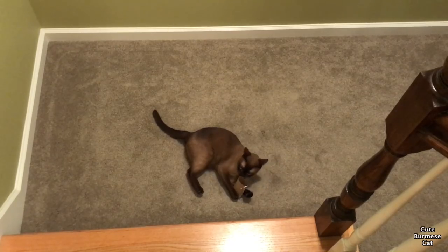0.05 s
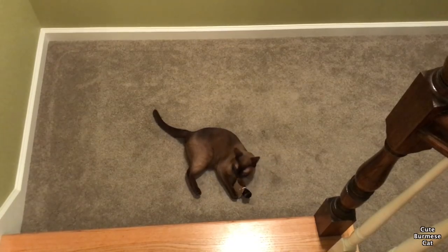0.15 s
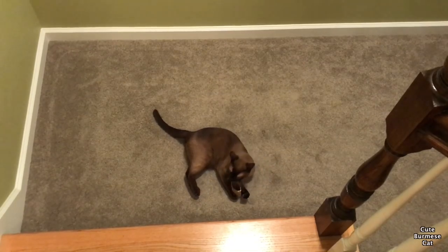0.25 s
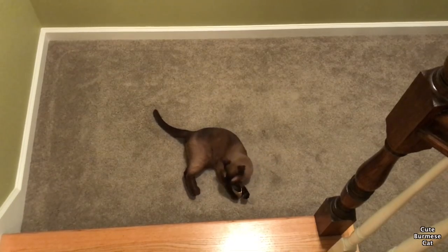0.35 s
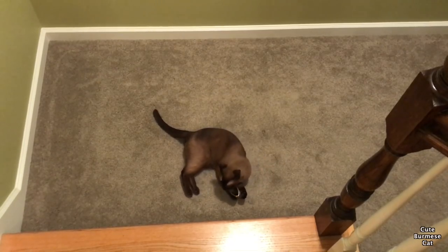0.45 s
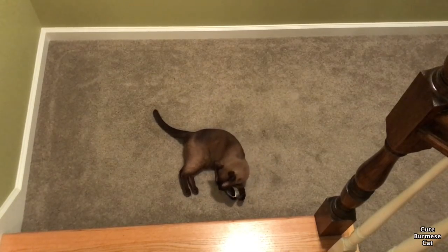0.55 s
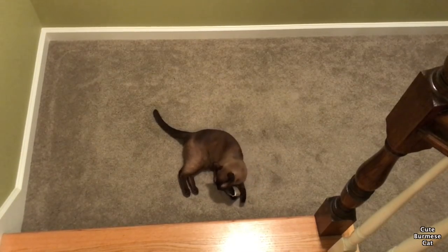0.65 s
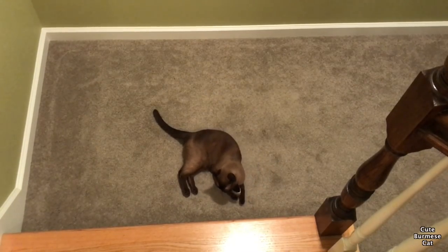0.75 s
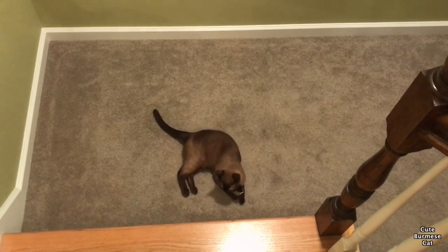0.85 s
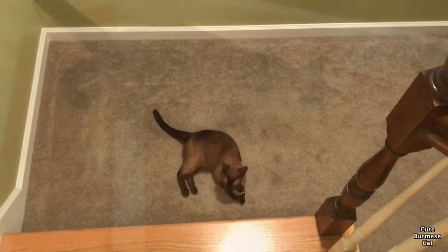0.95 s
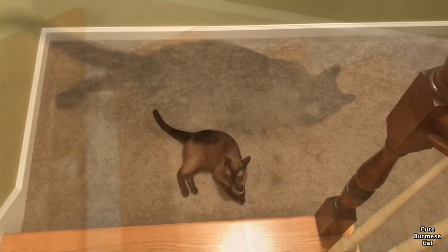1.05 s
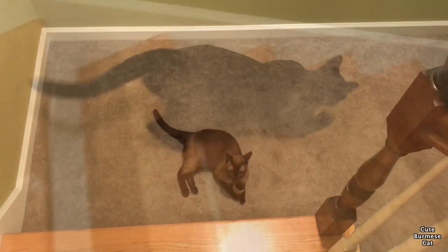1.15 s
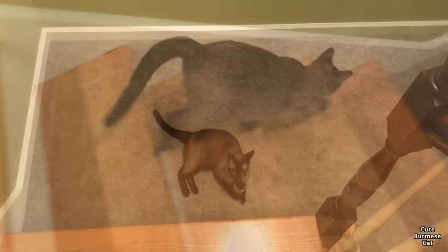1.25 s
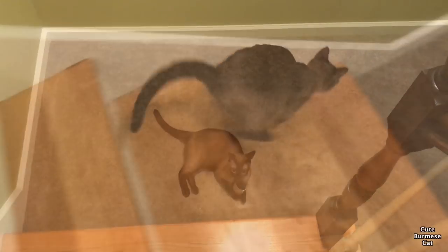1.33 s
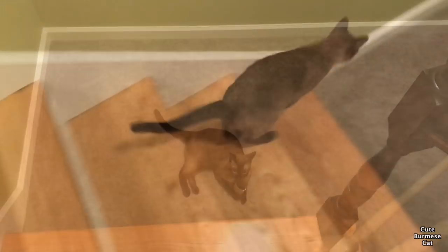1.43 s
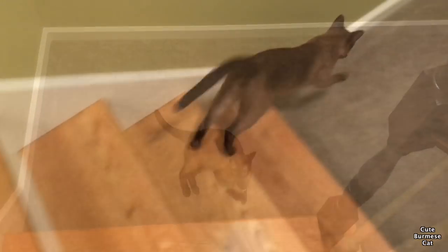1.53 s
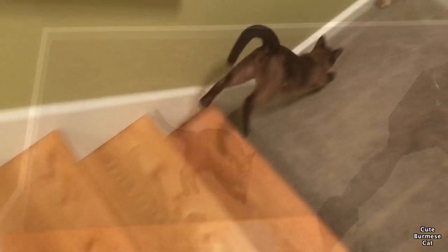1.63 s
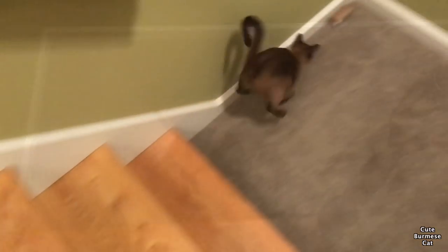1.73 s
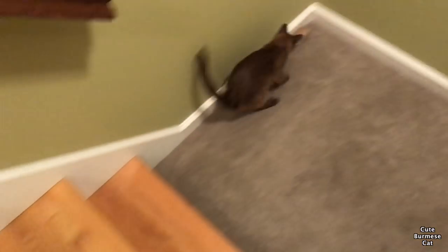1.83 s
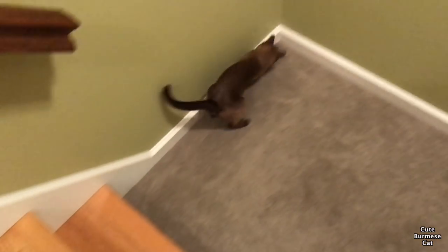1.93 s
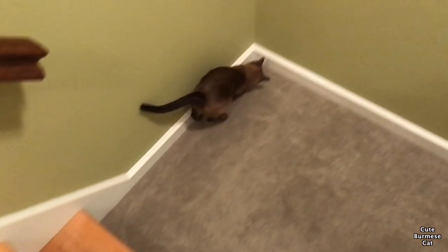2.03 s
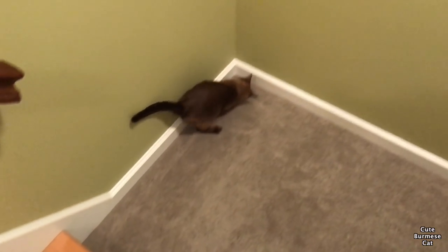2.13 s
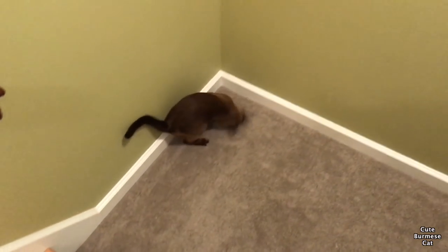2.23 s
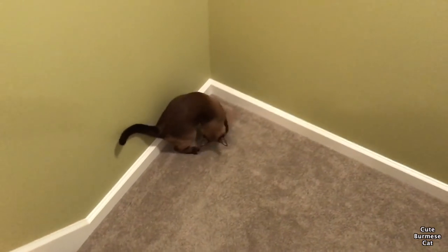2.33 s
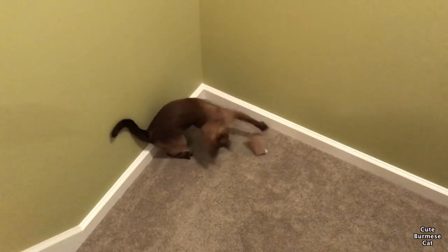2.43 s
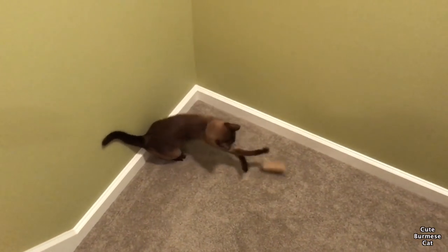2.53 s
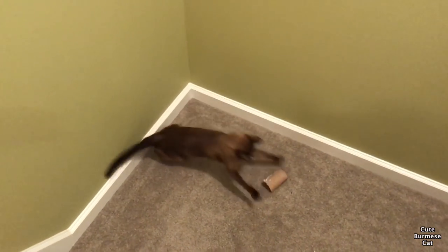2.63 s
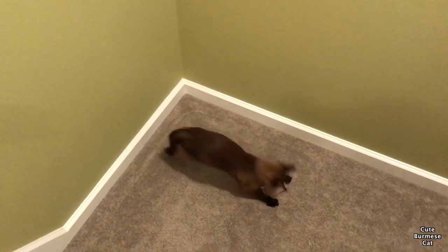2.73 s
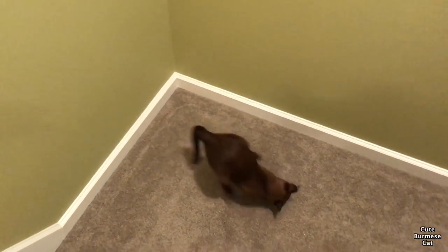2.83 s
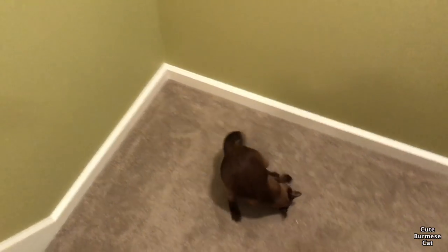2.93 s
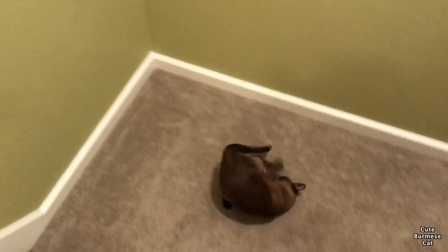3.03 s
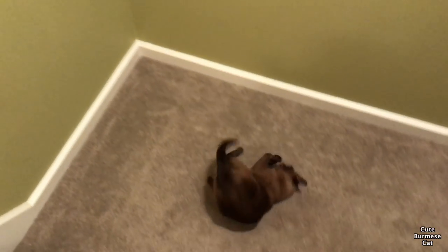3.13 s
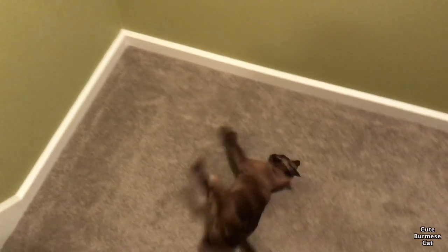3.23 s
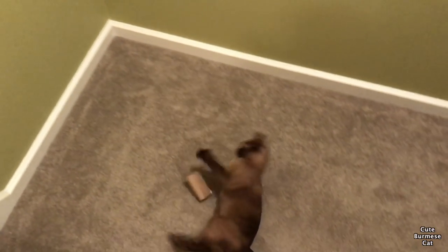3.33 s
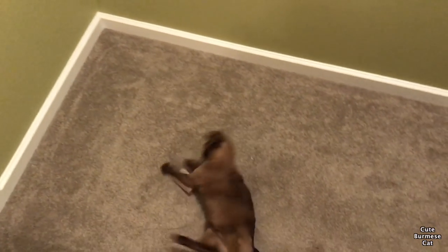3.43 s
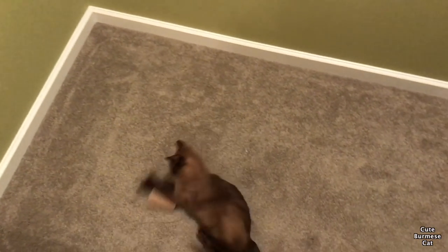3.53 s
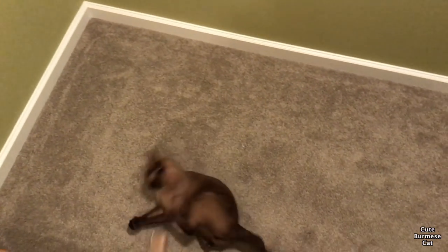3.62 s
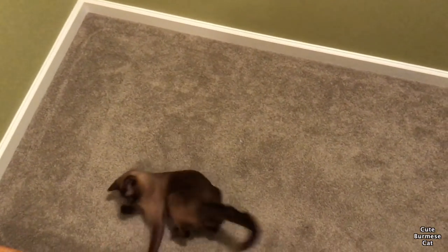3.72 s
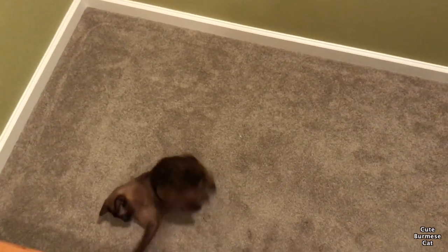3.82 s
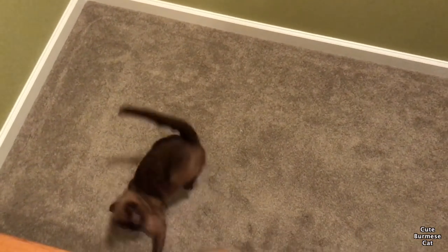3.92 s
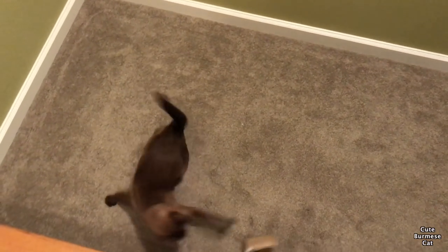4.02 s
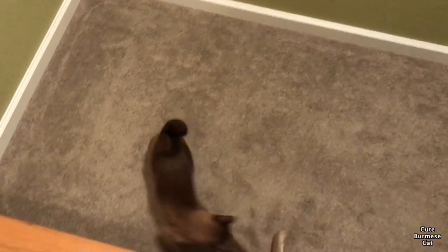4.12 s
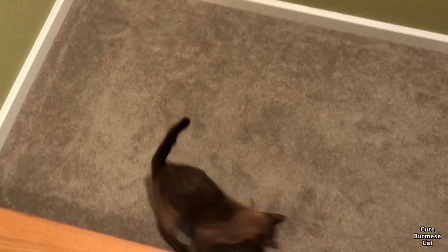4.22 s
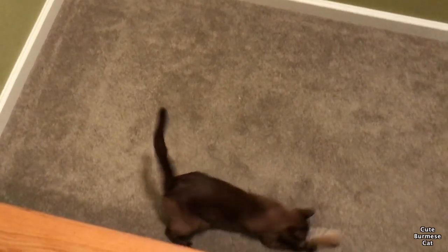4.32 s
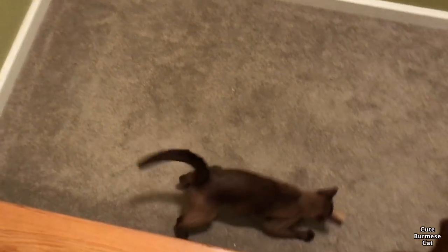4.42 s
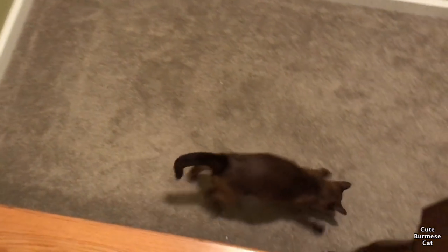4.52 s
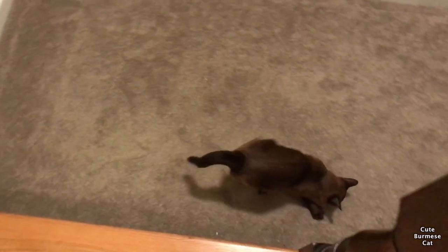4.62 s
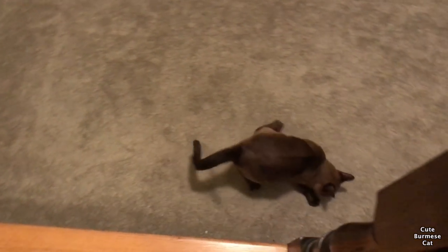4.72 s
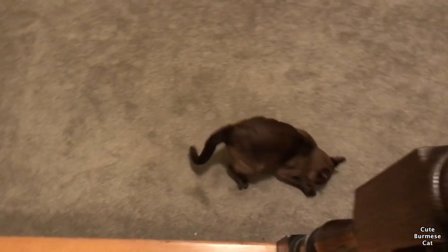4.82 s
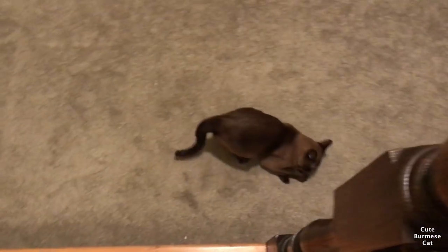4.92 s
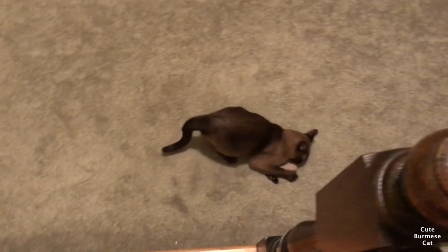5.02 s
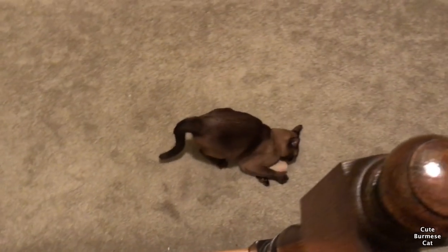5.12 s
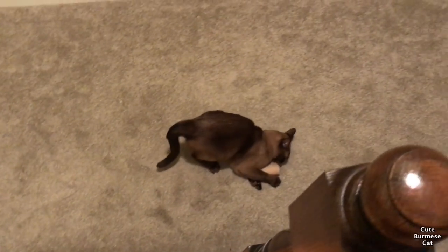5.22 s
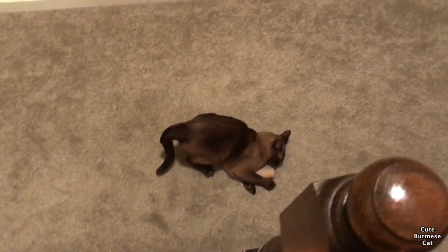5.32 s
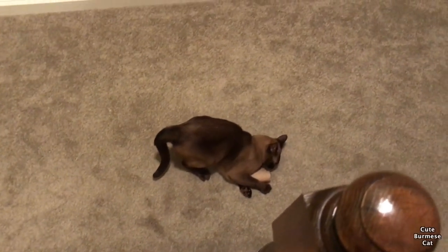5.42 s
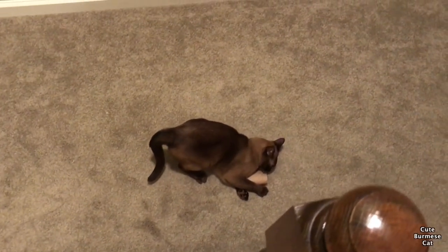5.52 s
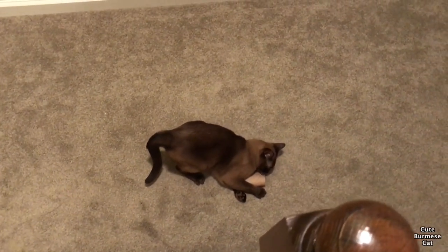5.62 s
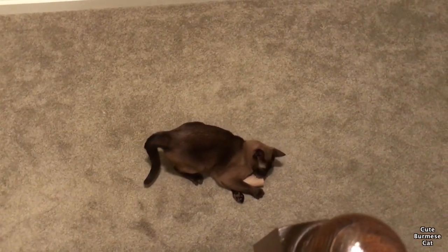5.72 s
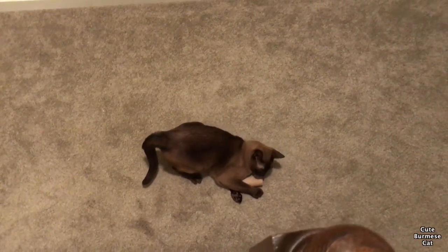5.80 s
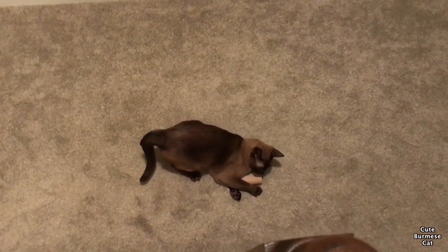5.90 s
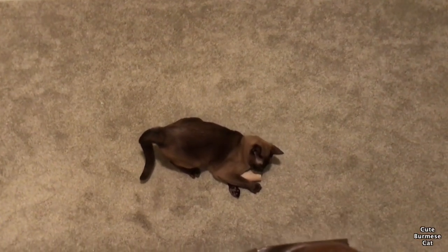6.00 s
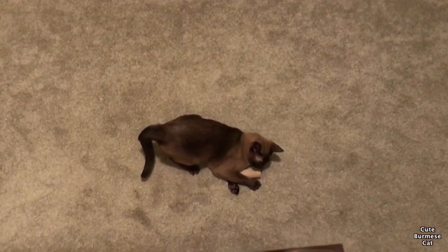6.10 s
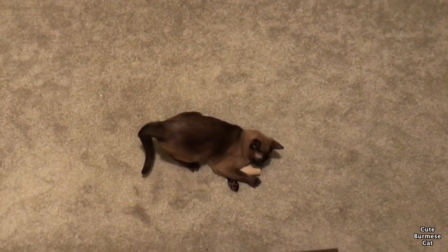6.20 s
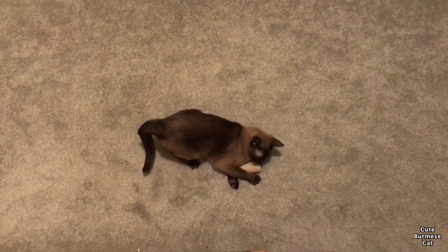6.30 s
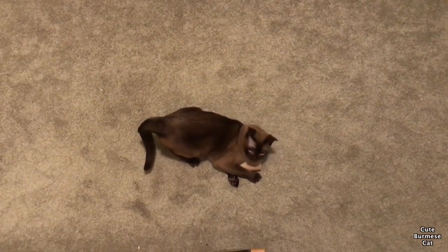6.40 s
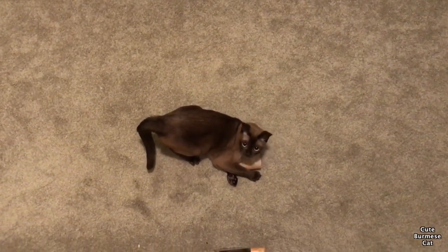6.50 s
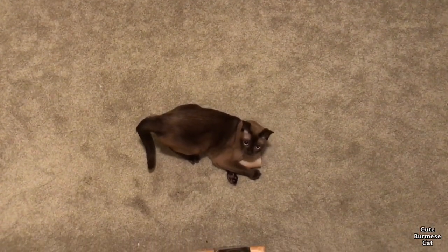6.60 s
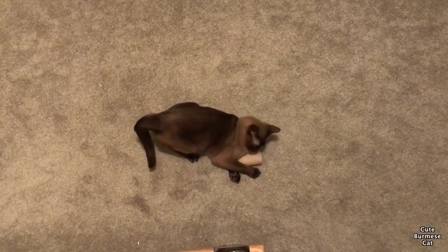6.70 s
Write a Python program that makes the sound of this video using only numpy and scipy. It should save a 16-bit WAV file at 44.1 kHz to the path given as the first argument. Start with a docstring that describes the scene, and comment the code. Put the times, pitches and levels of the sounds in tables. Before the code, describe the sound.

A cat bats a hollow cardboard tube over carpet indoors: brushy paw scuffs, then bursts of woody knocks and soft floor thuds over faint room rumble.

```python
"""A carpeted landing, heard from a phone held above the stairs: a cat bats a short cardboard tube about.
Paws and skids are uneven ticks, bare off the pile or through the tube's modes as it scrapes along.
Knocks on the tube, thuds on the boards under the carpet and claw flicks are bursts of damped modes.
A small room answers as a dull noise tail. Under it all lies quiet house noise, shaped from random
noise; early on its colour cross-fades to another that carries mains hum."""
import sys
import numpy as np
from scipy import signal
from scipy.fft import rfft, irfft
from scipy.io import wavfile
from scipy.ndimage import uniform_filter1d

SR = 44100
rng = np.random.default_rng(int(sys.argv[2]) if len(sys.argv) > 2 else 0)


def voltage_ratio(decibels):
    """Convert decibels (scalar or array-like) to amplitude ratios, 20 dB per decade."""
    exponent = np.asarray(decibels, float) / 20
    return 10 ** exponent


def int16_out(signal):
    """Quantize to a 16-bit WAV file."""
    q = np.round(np.clip(np.atleast_2d(signal).T, -1, 1) * 32767)
    wavfile.write(sys.argv[1], SR, q.astype(np.int16))


N = 297675  # samples, 6.75 s


def colour(x, points):
    """Shape a signal by (Hz, dB) points; rms 1."""
    hz, db = np.transpose(points)
    f = np.arange(len(x) // 2 + 1) * SR / len(x) + 1
    gain = voltage_ratio(np.interp(np.log(f), np.log(hz), db))
    y = irfft(rfft(x) * gain, len(x))
    return y / np.std(y)


def walk(rate):
    """Random levels held 1 / rate s and slewed twice; spread near 1."""
    k = int(SR / rate)
    held = np.repeat(rng.standard_normal(N // k + 1), k)
    slewed = uniform_filter1d(uniform_filter1d(held, k), k)
    return 1.3 * slewed[:N]


def resonate(x, hz, width):
    """One resonance, gain 1 at its centre; width in Hz."""
    return signal.lfilter(*signal.iirpeak(hz, hz / width, SR), x)


def add(out, s, x):
    """Mix a short sound in at s seconds."""
    i = int(s * SR)
    out[i:i + len(x)] += x[:N - i]


# Colour of the house noise at the start. Each row: frequency in Hz, relative density in dB per Hz.
EARLY_HOUSE = [(15, -52.5), (25, -23), (76, 1.5), (149, -11), (200, -7.5), (236, -8.5), (277, -11),
               (463, -23), (545, -26), (818, -27), (1610, -31), (11900, -41.5), (16000, -42)]
# Colour of the house noise after the fade. Each row: frequency in Hz, relative density in dB per Hz.
LATER_HOUSE = [(15, -59), (25, -25), (49, -7.5), (70, -6), (92, -12), (102, -6.5), (123, 0), (153, -14),
               (236, -11), (405, -23), (560, -27), (1290, -30), (2110, -35.5), (10400, -45.5),
               (12900, -43.5), (16000, -49.5)]
# Mains hum in the later noise. Each row: frequency in Hz, width in Hz, rms level in dB.
MAINS_HUM = [(120.37, 5.68, -68), (241.94, 44, -69)]
EARLY_HOUSE_DB, LATER_HOUSE_DB = -51.5, -53  # mean levels, about which each drifts
FADE_S = (0.938, 1.5222)  # start and end of the cross-fade


def house():
    """Rumble and microphone hiss are coloured noise, mains hum narrow-band noise; one bed fades to the other."""
    fade = np.interp(np.arange(N) / SR, FADE_S, [0, 1])
    early = voltage_ratio(EARLY_HOUSE_DB + 0.8 * walk(3)) * colour(rng.standard_normal(N), EARLY_HOUSE)
    later = voltage_ratio(LATER_HOUSE_DB + 0.5 * walk(2.548)) * colour(rng.standard_normal(N), LATER_HOUSE)
    for hz, width, db in MAINS_HUM:
        tone = resonate(rng.standard_normal(N), hz, width)
        later = later + voltage_ratio(db) * tone / np.std(tone)
    return (1 - fade) * early + fade * later


# Paw strokes over the pile. Each row: peak time in seconds, pile level in dB, tube scraping level in dB,
# seconds to rise 20 dB, seconds to fall 20 dB. A negative rise starts the stroke abruptly that long
# after the stated time; a negative fall cuts it off twice that long before.
STROKES = [(0.052, -56, -70, 0.3021, -0.0205), (0.22, -63.5, -73.5, -0.0533, 0.1972),
           (0.6, -67, -75, 0.2411, 0.5566), (0.349, -43, -53.5, 0.0427, 0.0929),
           (0.395, -47.5, -69, 0.0599, 0.0083), (0.864, -54.5, -77, 0.0548, 0.0454),
           (1.615, -85.5, -56, 0.1173, 0.0594), (1.665, -82.5, -61, 0.0618, 0.0436),
           (1.724, -81.5, -63.5, 0.1003, 0.132), (1.934, -69, -61, 0.1229, 0.2145),
           (2.021, -31, -60, 0.0123, 0.0758), (2.074, -45, -46.5, 0.0696, 0.2395),
           (2.29, -60.5, -49, 0.1069, 0.3094), (2.398, -36.5, -45.5, 0.1304, 0.0963),
           (2.578, -42, -51, -0.0092, 0.1169), (2.65, -61.5, -56.5, 0.1031, 0.2131),
           (2.716, -50.5, -60.5, -0.0002, 0.1343), (2.801, -38, -56.5, -0.004, 0.0592),
           (2.87, -52, -51, 0.0412, 0.2811), (2.982, -43.5, -51.5, 0.1608, 0.0816),
           (3.066, -45, -53.5, 0.0617, 0.1663), (3.165, -40.5, -50, 0.0715, 0.0428),
           (3.286, -55, -56.5, 0.0247, 0.0959), (3.356, -54, -58, -0.1337, 0.1667),
           (3.449, -50, -51, 0.0436, 0.0647), (3.475, -59, -51, 0.0881, 0.0441),
           (3.581, -46.5, -68, 0.0745, 0.0683), (3.688, -42, -44.5, 0.0266, 0.0546),
           (3.746, -45, -57.5, 0.0112, 0.0786), (3.849, -36.5, -58, 0.0156, 0.0504),
           (3.943, -55.5, -65, 0.1239, 0.0944), (3.99, -61, -57, 0.1777, 0.2264),
           (4.101, -54, -56, 0.0369, 0.1043), (4.213, -46.5, -58.5, 0.0433, 0.0472),
           (4.277, -56, -63, 0.0492, 0.0977), (4.432, -37.5, -56.5, 0.044, 0.0699),
           (4.5, -53.5, -59.5, 0.1576, 0.3137), (4.765, -49, -55.5, 0.0518, 0.1994),
           (4.79, -50, -51.5, 0.058, 0.1081), (4.994, -53, -58, 0.1367, 0.314),
           (5.102, -60, -61, 0.29, 0.106), (5.194, -63, -63, -0.05, 0.1545)]
# Sudden skids and claw catches. Each row: time in seconds, pile level in dB, tube scraping level in dB,
# seconds to fall 20 dB.
SKIDS = [(1.508, -62.5, -58, 0.0318), (2.009, -31.5, -50, 0.0425), (2.569, -43, -55.5, 0.0629),
         (2.684, -51.5, -63.5, 0.1649), (2.762, -56, -61.5, 0.2622), (2.776, -50.5, -36, 0.0241),
         (2.78, -42, -60.5, 0.1014), (3.468, -45.5, -57, 0.0276), (3.535, -43.5, -31.5, 0.022),
         (3.548, -46, -59.5, 0.1206), (3.834, -51.5, -41, 0.0277), (3.955, -49, -33, 0.0362),
         (4.172, -53, -69, 0.1776), (4.185, -47.5, -45, 0.0561), (4.318, -53.5, -46.5, 0.0731),
         (4.356, -46.5, -49, 0.0943), (4.393, -44, -46.5, 0.0742), (4.41, -40, -55, 0.0482),
         (4.508, -48, -57, 0.0212), (4.672, -54, -46, 0.0541), (5.333, -52, -62.5, 0.0336)]
SKID_RISE_S = 0.002875  # to rise 20 dB
TILT_DB, DULLER_PER_DB = -4, 0.2278  # dB per octave at a stroke's peak; steeper by this per dB of fade


def contact(t):
    """Strokes swell from 20 dB under their peak and fade, growing duller; skids rise almost at once."""
    skids = [(s, pile_db, tube_db, SKID_RISE_S, fall_s) for s, pile_db, tube_db, fall_s in SKIDS]
    pile_power, tube_power, faded_db = np.zeros((3, N)) + 1e-9
    for s, pile_db, tube_db, rise_s, fall_s in list(STROKES) + skids:
        on = slice(max(int((s - rise_s) * SR), 0), int((s + 2 * fall_s) * SR))
        before_db = 20 * np.maximum(s - t[on], 0) / rise_s
        after_db = 20 * np.maximum(t[on] - s, 0) / fall_s
        shape = voltage_ratio(-before_db - after_db)
        pile_power[on] += voltage_ratio(2 * pile_db) * shape ** 2
        tube_power[on] += voltage_ratio(2 * tube_db) * shape ** 2
        faded_db[on] += voltage_ratio(2 * pile_db) * shape ** 2 * after_db
    # the fade, averaged over overlapping strokes by their power, sets the tilt
    tilt_db = TILT_DB - DULLER_PER_DB * faded_db / pile_power
    return np.sqrt(pile_power), tilt_db, np.sqrt(tube_power)


# Colour of the carpet fibres. Each row: frequency in Hz, relative density in dB per Hz.
PILE = [(180, -70.5), (300, -0.5), (1280, -25.5), (1660, -13.5), (2930, -4.5), (6960, 3), (7690, -1),
        (8940, 3), (12500, 5), (15700, 0), (16400, -68.5)]
# The tube's air column and wall, rubbed here and struck in the knocks. Each row: mode frequency in Hz,
# nominal width in Hz, relative level in dB.
TUBE = [(613.76, 103.46, 4.5), (857.07, 87.12, 6), (1000, 109.39, 5.5), (1150, 127.77, 3.5),
        (1300, 118.7, 2), (1550, 99.63, 4), (1680, 198.88, 4), (1953, 211.56, 4), (2208.2, 194.8, 3.5),
        (2585, 196.17, 1.5), (2870, 200.25, 1), (3241.9, 226.7, -0.5), (4070.2, 551.5, -1.5)]


def slides():
    """Fibres slip as dense uneven ticks: bare under the paws, through the tube's modes when it scrapes."""
    on_pile, tilt_db, on_tube = contact(np.arange(N) / SR)
    unevenness = np.minimum(rng.exponential(size=(2, N)), 5)
    ticks = rng.standard_normal((2, N)) * voltage_ratio(1.267 * unevenness)

    fibres = colour(ticks[0] * voltage_ratio(2.2 * walk(250) + 0.3 * walk(50)), PILE)
    pile = 0
    for k, hz in enumerate(400 * 2 ** np.arange(0, 5.6, 0.5)):
        # every patch of pile has its own colour, so the bands waver a little on their own
        band = (-1) ** k * voltage_ratio(0.9 * walk(30)) * resonate(fibres, hz, hz / 2.5)
        pile = pile + voltage_ratio(tilt_db * np.log2(max(hz, 2000) / 8000)) * band

    rub = ticks[1] * voltage_ratio(3.213 * walk(120))
    tube = 0
    for k, (hz, width, gain_db) in enumerate(TUBE):
        # rubbing stirs the air column most
        share_db = gain_db - 8.028 * abs(np.log2(hz / 1494.8))
        tube = tube + (-1) ** k * voltage_ratio(share_db) * resonate(rub, hz, 1.4754 * width)

    # a paw needs a few milliseconds to bear down
    pile_gain, tube_gain = signal.lfilter([0.016], [1, -0.984], [on_pile, on_tube])
    return pile_gain * pile + tube_gain * tube / np.std(tube)


def ring(modes, share_db, db, stretch, rise_s):
    """One blow: damped modes, each a little detuned, swelling in while the contact lasts; peak at db."""
    f, width, gain_db = np.transpose(modes)[:, :, None]
    detune, phase, uneven = rng.standard_normal((3, len(modes), 1))
    t = np.arange(SR // 5) / SR
    tones = np.sin(2 * np.pi * (f * (1 + 0.01702 * detune) * t + phase))
    decay = np.exp(-np.pi * width * t / np.clip(stretch, 0.1, 3))
    # low modes take longer to get moving
    swell = (1 - np.exp(-t / rise_s * f / np.median(f))) ** 2
    level = voltage_ratio(gain_db + share_db + 1.5 * uneven)
    x = np.sum(level * tones * swell * decay, axis=0)
    return voltage_ratio(db) * x / np.max(np.abs(x))


# Knocks on the tube. Each row: start in seconds, peak level in dB, favoured pitch in Hz, change in dB
# one octave above that pitch, low wall flex (share of the lowest mode) in dB.
KNOCKS = [(1.024, -51, 1680, -14.5, -5.5), (1.502, -42, 1550, -21, -9), (1.51, -47, 2585, -18.5, -20.5),
          (1.519, -47, 2585, -22.5, -19.5), (1.514, -33.5, 927.2, -17.5, -8),
          (1.57, -39.5, 996.4, -7.5, -12.5), (1.61, -41.5, 1647, -12, -13.5),
          (1.625, -48.5, 2141, -20.5, -13.5), (2.008, -23, 1864, -15.5, -11), (2.013, -18, 1953, -23, -20),
          (2.014, -16, 2418, -4.5, -20), (2.02, -23.5, 2870, -12, -21.5),
          (2.049, -28.5, 1010, -23.5, -11.5), (2.0625, -22, 1204, -19, -12),
          (2.077, -29.5, 1150, -22, -15.5), (2.091, -32, 1054, -16, -5), (2.574, -39, 1913, -32.5, -28.5),
          (2.595, -29, 1602, -21.5, -18), (2.603, -25, 1551, -29.5, -22.5),
          (2.615, -32.5, 1550, -34.5, -25), (2.633, -39.5, 1550, -36, -25.5),
          (2.646, -42, 1550, -36.5, -25), (2.777, -20, 1300, -14.5, -13), (2.78, -26, 1000, -16, -15.5),
          (2.794, -29.5, 1550, -25.5, -10.5), (2.802, -23.5, 1300, -17.5, -5.5),
          (2.843, -31, 1090, -32.5, -33.5), (2.941, -35, 1586, -17.5, -4.5), (3.178, -27.5, 813, -10.5, 3),
          (3.449, -32.5, 1354, -1.5, -4.5), (3.468, -42.5, 1620, -29, -16.5), (3.535, -21, 1633, -17, -18),
          (3.538, -25.5, 1508, -23.5, -8), (3.543, -26, 1483, -27.5, 9), (3.556, -32.5, 1300, -19, 8),
          (3.679, -30, 1680, -15.5, -6.5), (3.837, -33, 1550, -23, 0), (3.846, -30.5, 1612, -27.5, -7),
          (3.866, -35.5, 1495, -29.5, -1), (3.955, -21, 1953, -12, -11), (3.959, -22.5, 1550, -16.5, -0.5),
          (3.968, -31, 1550, -27, -3.5), (3.977, -27, 1493, -25, -3.5), (4.185, -39, 2212, -30, -6.5),
          (4.193, -41.5, 2210, -28.5, -9.5), (4.205, -42, 2201, -30, -14.5),
          (4.253, -40.5, 1550, -15.5, -5), (4.3195, -30.5, 1680, -16.5, -3.5),
          (4.323, -26.5, 1244, -18.5, 2), (4.346, -38.5, 2095, -30.5, -16), (4.358, -33, 1000, -17, 4.5),
          (4.392, -30, 1185, -8.5, -6), (4.411, -33.5, 1680, -20.5, -21.5),
          (4.416, -30.5, 1566, -22.5, -26), (4.432, -33, 1502, -24.5, -13), (4.451, -36, 2199, -14.5, -5.5),
          (4.506, -36, 1499, -18.5, -14), (4.671, -25, 1422, -23.5, -36), (4.837, -35, 1500, -16.5, -11),
          (5.06, -45, 1000, -8, -17), (5.333, -37.5, 1128, -12, -32.5)]
RING_STRETCH = 0.9635  # ring length factor of a light knock
LIGHT_KNOCK_DB, SHORTER_PER_DB = -32, 0.0337  # each dB above a light knock takes this off the factor


def knocks():
    """A claw stirs the high modes at once; a pad presses longer and stirs only those near its pitch."""
    out = np.zeros(N)
    for s, db, hz, fall_db, flex_db in KNOCKS:
        # a harder blow pins the tube against the carpet, so it rings shorter
        stretch = RING_STRETCH - SHORTER_PER_DB * max(db - LIGHT_KNOCK_DB, 0)
        octaves = np.log2(np.array(TUBE)[:, :1] / hz)
        above_db = fall_db * np.sqrt(np.abs(octaves))
        share_db = np.where(octaves > 0, above_db, 36.376 * octaves)
        share_db[0] = flex_db
        rise_s = 0.000085 * voltage_ratio(-0.8 * fall_db)
        add(out, s, ring(TUBE, share_db, db, stretch, rise_s))
    return out


# Paws and body landing. Each row: start in seconds, peak level in dB, favoured pitch in Hz,
# ring length as a factor.
THUDS = [(1.37, -43.5, 129.9, 0.2115), (1.503, -33.5, 373.3, 0.5613), (1.529, -33, 270.3, 0.652),
         (1.72, -34.5, 155.1, 0.277), (1.745, -34, 81.34, 0.506), (1.928, -42, 111, 0.5415),
         (2.008, -34, 157.8, 0.3224), (2.21, -39, 162, 0.592), (2.253, -28.5, 234.1, 0.8175),
         (2.276, -36, 274.5, 0.945), (2.597, -32.5, 439.2, 0.8196), (2.796, -29.5, 273.7, 0.3209),
         (2.819, -38.5, 209.2, 0.693), (3.288, -38, 71, 0.5504), (3.398, -22.5, 262.8, 0.577),
         (3.405, -25.5, 290.5, 0.495), (3.42, -29.5, 250, 0.839), (3.433, -31.5, 241.1, 0.6997),
         (3.452, -36.5, 250, 0.897), (3.479, -40.5, 250, 0.771), (3.546, -37.5, 223, 0.859),
         (3.57, -33.5, 200, 0.3968), (3.673, -38, 242.6, 0.4045), (3.837, -32, 434.8, 0.96),
         (3.862, -33, 432.9, 0.774), (3.878, -36.5, 301.9, 0.7914), (3.955, -34, 330.8, 1.155),
         (4.044, -40.5, 145, 0.4547), (4.111, -34.5, 152, 1.756), (4.185, -33.5, 398, 1.1445),
         (4.258, -33.5, 67.3, 0.574), (4.311, -35, 80.67, 0.985), (4.356, -29.5, 479.4, 0.6118),
         (4.417, -32.5, 455.1, 0.999), (4.671, -33, 438.5, 1.0277), (4.71, -46.5, 137, 1.079),
         (5.348, -42, 242.8, 0.2957)]
# The boards under the carpet. Each row: mode frequency in Hz, width in Hz at ring length 1,
# relative level in dB.
BOARDS = [(73.4, 34.17, -13), (112.32, 58.29, -1.5), (152, 59.37, 16), (200, 82.53, 2), (250, 80.52, -0.5),
          (315.8, 119.87, 0.5), (368.17, 138.6, 7), (493.56, 123.93, 2.5)]


def thuds():
    """Soft pads push slowly: the boards swell in over milliseconds, mostly the modes near the blow's pitch."""
    out = np.zeros(N)
    for s, db, hz, stretch in THUDS:
        share_db = -38 * np.abs(np.log2(np.array(BOARDS)[:, :1] / hz))
        add(out, s, ring(BOARDS, share_db, db, stretch, 0.001966))
    return out


# Claws flicking off the pile and the tube's edge. Each row: start in seconds, peak level in dB,
# favoured pitch in Hz.
FLICKS = [(2.0137, -27, 7200), (2.022, -30, 5750), (2.027, -28, 5898), (2.032, -29, 6623),
          (2.045, -35, 5750), (2.056, -36.5, 6304), (2.777, -33, 3700), (3.535, -35.5, 4884),
          (3.568, -41, 5851), (3.845, -36, 6079), (3.857, -37, 6086), (5.333, -45.5, 4366),
          (5.338, -51, 4387)]
# A claw's short ring. Each row: mode frequency in Hz, nominal width in Hz, relative level in dB.
CLAW = [(3700, 395.8, 1.5), (4485.5, 431, -0.5), (5193.4, 350, -1.5), (5750, 128.4, 1),
        (6181.6, 199.7, -0.5), (6639.7, 123.9, -1.5), (7200, 253, 0.5), (8990, 894, -5.5),
        (12500, 1500, -9)]


def flicks():
    """A claw springs free and rings briefly, mostly near one pitch."""
    out = np.zeros(N)
    for s, db, hz in FLICKS:
        share_db = -50 * np.abs(np.log2(np.array(CLAW)[:, :1] / hz))
        add(out, s, ring(CLAW, share_db, db, 0.9816, 0.0002764))
    return out


ROOM_T60_S, ROOM_DULL_HZ = 0.30468, 2207.3  # decay by 60 dB; treble rolls off above
FIRST_ECHO_S, ECHOES_BUILD_S = 0.00304, 0.004624


def room(x):
    """A diffuse, dull noise tail that builds up from the first wall echoes and dies away."""
    t = np.arange(SR // 2) / SR
    decay = np.exp(-np.log(1000) * t / ROOM_T60_S)
    build = np.clip((t - FIRST_ECHO_S) / ECHOES_BUILD_S, 0, 1)
    tail = rng.standard_normal(len(t)) * decay * build
    tail = signal.lfilter(*signal.butter(1, ROOM_DULL_HZ, fs=SR), tail)
    return signal.fftconvolve(x, tail / np.sqrt(np.sum(tail ** 2)))[:N]


KNOCK_ROOM_DB, THUD_ROOM_DB, SLIDE_ROOM_DB = -11, -6, -12  # level sent to the room


def scene():
    """Cat and tube in the room over the house noise; thuds spread through the boards and sound furthest."""
    slide = slides()
    knock = knocks() + flicks()
    thud = thuds()
    far = voltage_ratio(KNOCK_ROOM_DB) * knock + voltage_ratio(THUD_ROOM_DB) * thud + voltage_ratio(SLIDE_ROOM_DB) * slide
    return (knock + thud + slide + room(far) + house())[None]


def low_pass(x):
    """Removes everything above the highest recorded frequency."""
    return signal.sosfilt(signal.butter(12, 16460, fs=SR, output="sos"), x)


def record(dry):
    """The phone cuts the deepest bass, below 40 Hz, and the top, above 15.8 kHz."""
    bass_cut = signal.butter(3, 40, "high", fs=SR, output="sos")
    top_cut = signal.ellip(10, 0.2, 70, 15800, fs=SR, output="sos")
    mix = signal.sosfilt(top_cut, signal.sosfilt(bass_cut, dry))
    return low_pass(mix)


dry = scene()
out = record(dry)
int16_out(out)
```